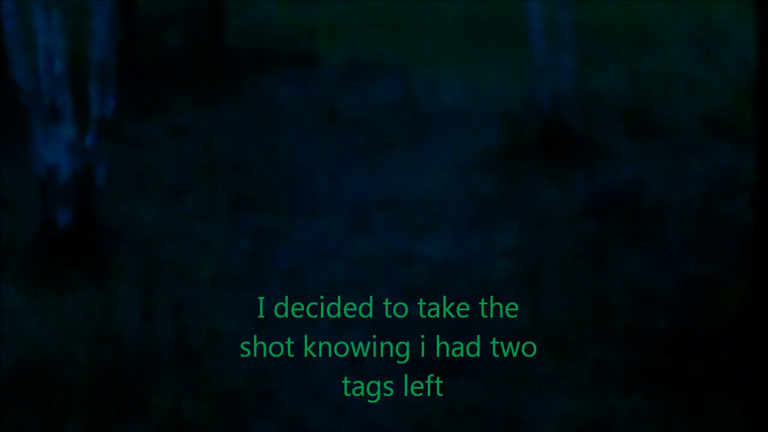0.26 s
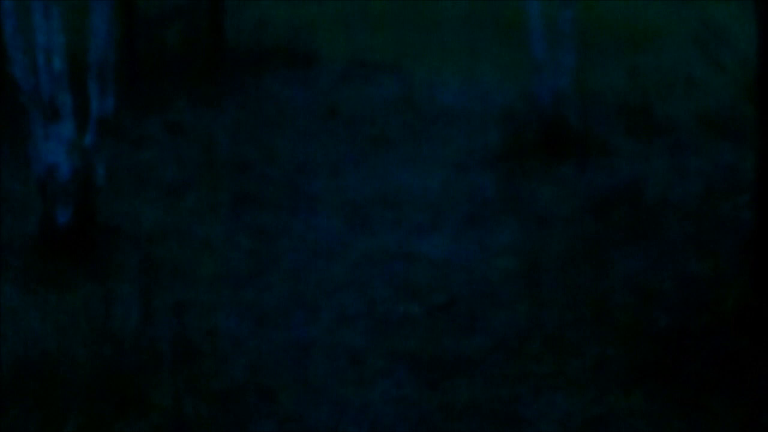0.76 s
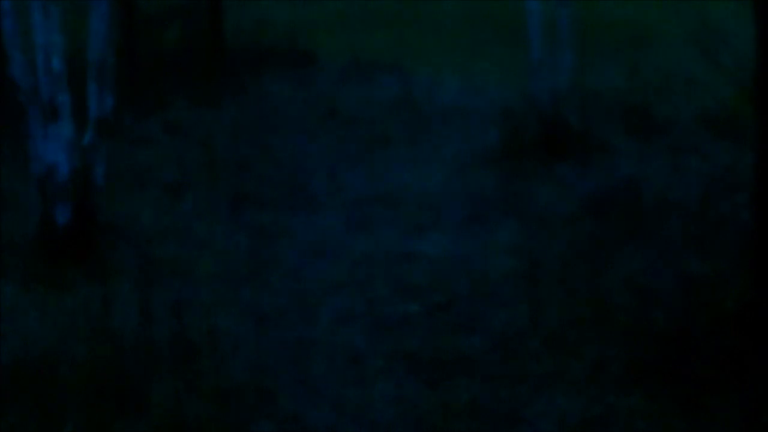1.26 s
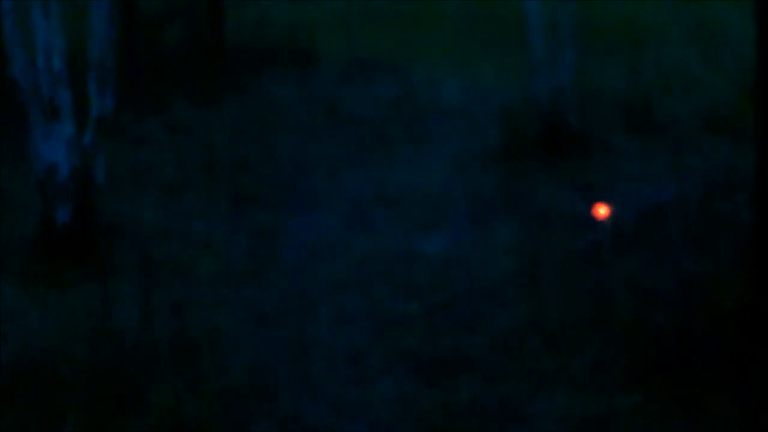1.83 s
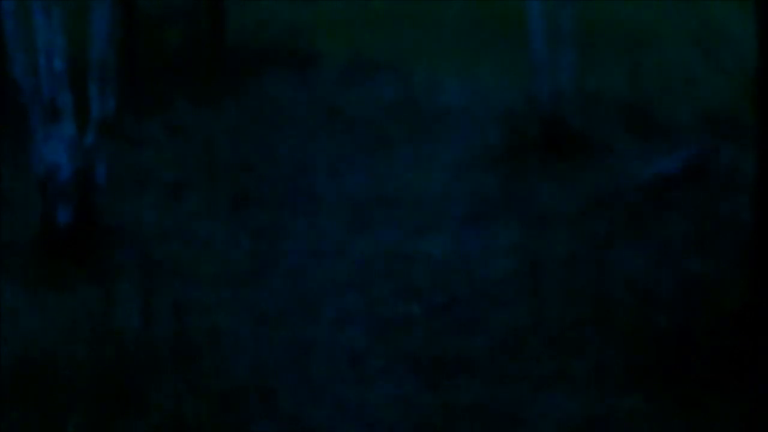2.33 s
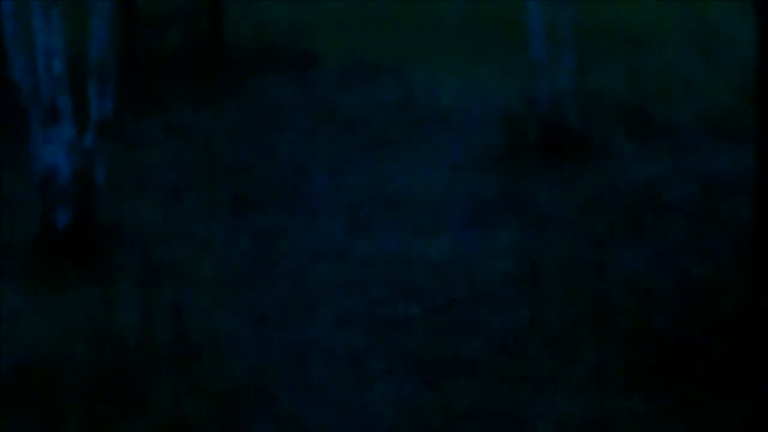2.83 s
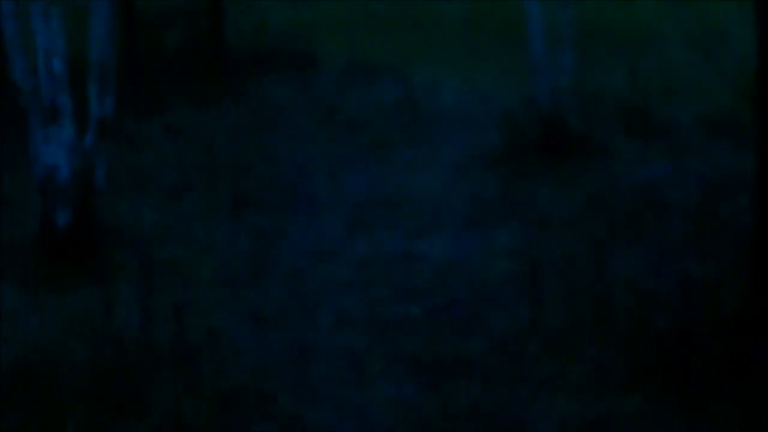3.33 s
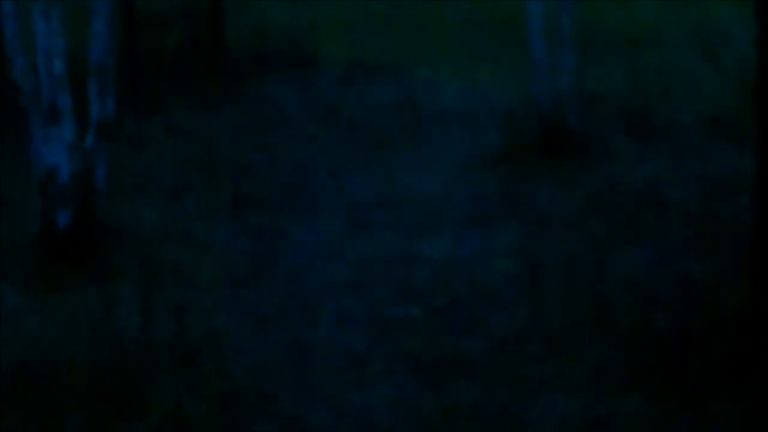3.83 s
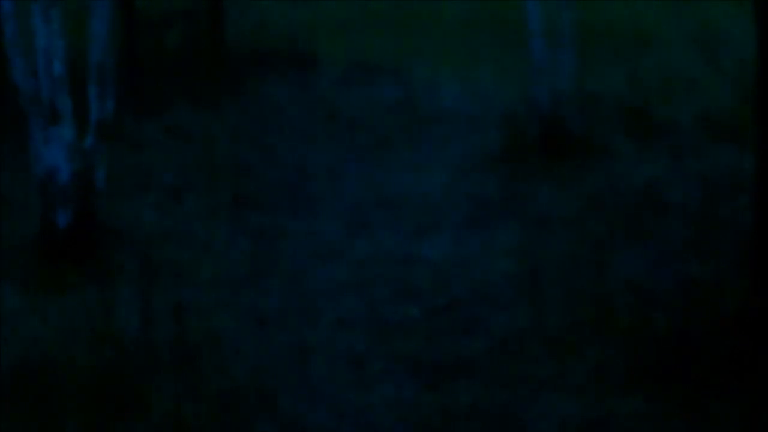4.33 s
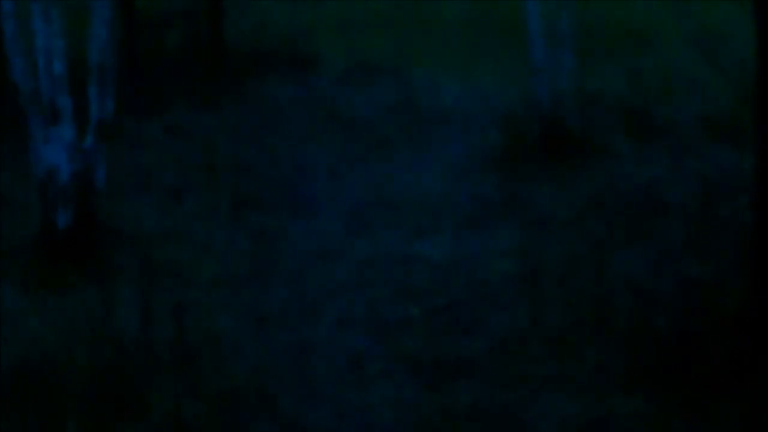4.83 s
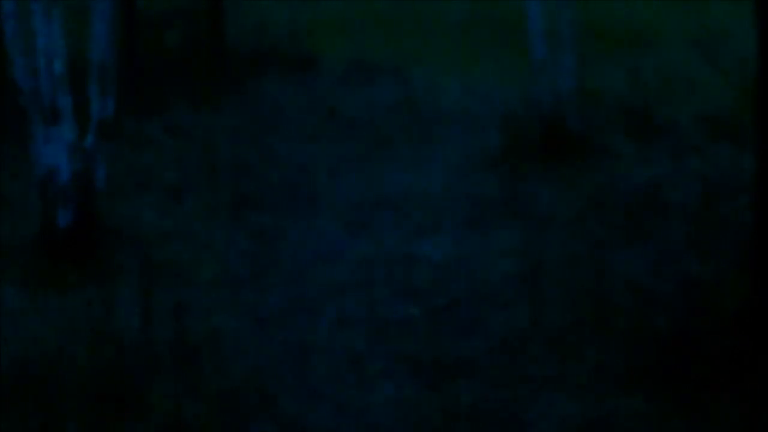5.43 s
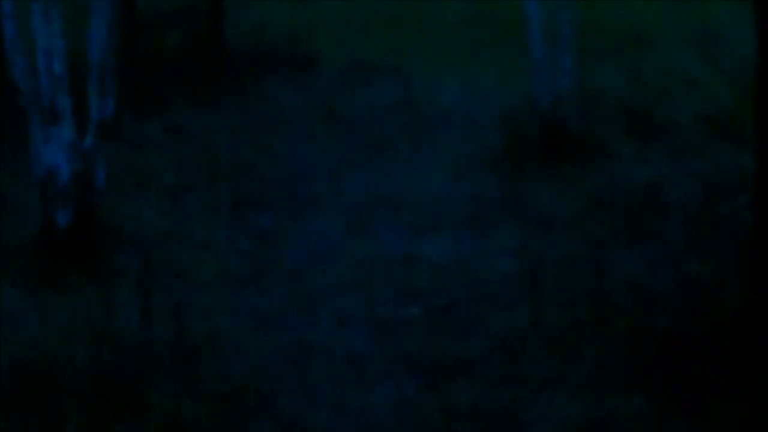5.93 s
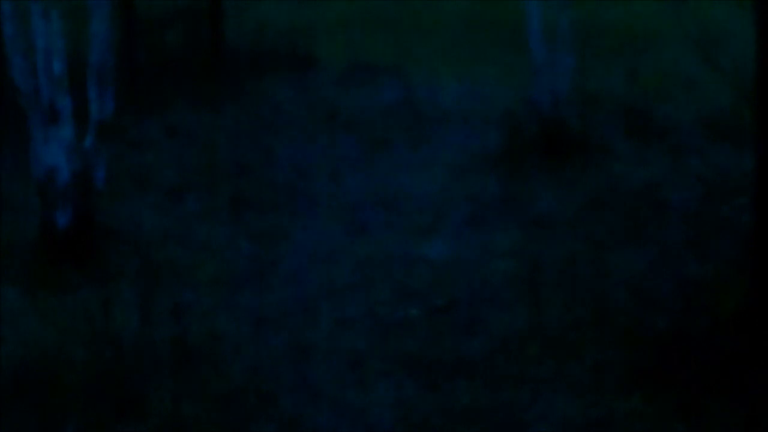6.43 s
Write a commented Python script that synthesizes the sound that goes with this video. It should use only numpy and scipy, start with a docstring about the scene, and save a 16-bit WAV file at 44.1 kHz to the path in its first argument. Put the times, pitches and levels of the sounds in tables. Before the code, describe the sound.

Light rain ticks on leaves in a wood; a bow snaps close by, the arrow smacks hollowly, and an animal crashes off through brush.

```python
"""Bow shot in a rainy wood

Filtered noise and tiny random rings make light rain on leaves and a low breeze; a sleeve of soft noise brushes past.
A bow is shot beside the camera in noise snaps and damped modes, and the arrow strikes with a hollow smack.
An animal bolts through crackling brush on thudding hooves, snapping sticks that ring in short modes.
The camera's microphone rings in the treble, and its gain control ducks when a sound is loud.
"""
import sys
import numpy as np
from scipy import signal
from scipy.fft import rfft, irfft
from scipy.io import wavfile
from scipy.ndimage import map_coordinates

SR = 44100
rng = np.random.default_rng(int(sys.argv[2]) if len(sys.argv) > 2 else 0)


def store_wav(level_fs):
    """Save 16-bit WAV to argv[1]."""
    pcm = np.round(np.clip(np.atleast_2d(level_fs), -1, 1) * 32767)
    wavfile.write(sys.argv[1], SR, pcm.T.astype(np.int16))


N = 294147
TIME = np.arange(N) / SR  # seconds through the scene
AGE = np.arange(SR // 5) / SR  # seconds since one short sound began
IMPACT_S = 1.931  # the arrow lands and the animal starts


def amp(db):
    """Decibels to gain."""
    return 10 ** (np.asarray(db) / 20)


def unit(x):
    """x at rms 1."""
    return x / np.sqrt(np.mean(x ** 2) + 1e-20)


def noise():
    """White noise as long as the scene."""
    return rng.standard_normal(N)


def along(points, hz):
    """Read a curve of (Hz, value) points at hz, on a log frequency axis."""
    f, value = np.transpose(points)
    return np.interp(np.log(hz + 1), np.log(f), value)


def wobble(rate):
    """A smooth random curve with rate knots a second."""
    knots = rng.standard_normal(int(N * rate / SR) + 4)
    return map_coordinates(knots, [TIME * rate])


def coloured(x, points, size=16384):
    """x through a causal, minimum-phase filter with the given (Hz, dB) gain."""
    gain = amp(along(points, np.fft.rfftfreq(size, 1 / SR)))
    cepstrum = irfft(np.log(gain))
    # folding the cepstrum forward puts the energy as early as it can be
    cepstrum[1:size // 2] *= 2
    cepstrum[size // 2 + 1:] = 0
    impulse = irfft(np.exp(rfft(cepstrum)))
    return signal.fftconvolve(x, impulse)[:N]


def add(track, s, sound):
    """Mix a sound in at time s."""
    part = track[round(s * SR):][:len(sound)]
    part += sound[:len(part)]


def fade(t60):
    """Exponential decay that loses 60 dB in t60 seconds."""
    return np.exp(-np.log(1000) * AGE / t60)


def ring(hz, t60):
    """One damped mode."""
    return np.sin(2 * np.pi * hz * AGE) * fade(t60)


def snap(t60):
    """A dying noise burst that starts at rms 1."""
    burst = rng.standard_normal(len(AGE)) * fade(t60)
    return burst * np.linalg.norm(fade(t60)) / np.linalg.norm(burst)


def push(width):
    """Smooth pressure that dips to -1, then swings to +1, width seconds to each side of its centre."""
    u = AGE / width - 3  # the centre comes three widths in
    return u * np.exp((1 - u * u) / 2)


def swells(rows):
    """Gain curve of (s, dB, rise s, fall s) swells; each gains 20 dB over its rise and loses 20 dB over its fall."""
    power = 0
    for s, db, rise, fall in rows:
        steps = np.maximum((s - TIME) / rise, (TIME - s) / fall)
        power = power + amp(db - 20 * steps) ** 2
    return np.sqrt(power)


def grains(rate, spread_db, hz, scatter, cycles):
    """Random tiny impacts, rate a second, each a short ring at its own pitch and size; rms 1 overall."""
    when, size, pitch, phase = rng.random((int(rate * N / SR), 4)).T[:, :, None]
    f = np.clip(hz * np.exp(scatter * np.log(pitch / (1 - pitch))), 500, 15000)
    n = np.arange(SR // 500)
    turns = f * n / SR
    strength = amp(-spread_db * np.log(size + .045)) * np.sqrt(f)
    waves = strength * np.exp(-turns / cycles) * np.sin(2 * np.pi * (turns + phase))
    places = (when * N).astype(int) + n
    return unit(np.bincount(places.ravel(), waves.ravel(), N)[:N])


# how long the wood answers. Each row: frequency in Hz, time to lose 60 dB in seconds
WOOD_T60 = [(150, .15), (1000, 0.28), (2500, 0.37), (8000, 0.35), (15000, 0.076)]


def trees(x):
    """The diffuse answer of trunks and leaves: a noise tail that dies at its own pace in each band."""
    hz, t, z = signal.stft(rng.standard_normal(SR // 2), SR, nperseg=256)
    decay = np.exp(-np.log(1000) * t / along(WOOD_T60, hz)[:, None])
    tail = signal.istft(z * decay, SR, nperseg=256)[1]
    return signal.fftconvolve(x, tail / np.linalg.norm(tail))[:N]


# spectrum of the moving air. Each row: frequency in Hz, gain in dB
RUMBLE = [(10, -10), (28, 0), (60, -1), (130, -3.5), (200, -8.5), (400, -16.5), (900, -29.5), (3000, -70.5)]
AIR_DB, AIR_CALMING_DB_PER_S = -49.8, .35  # the breeze, slowly settling


def air():
    """A low, restless rumble of moving air, made of filtered noise."""
    level = amp(AIR_DB - AIR_CALMING_DB_PER_S * TIME + 1.1 * wobble(9))
    return level * unit(coloured(noise(), RUMBLE))


# single near raindrops. Each row: start in seconds, level in dB, leaf body in dB against that level
DROPS = [(0.3975, -24.5, -15), (0.5276, -18, -16), (0.822, -25, -20), (0.8335, -24.5, -12.5),
         (1.0653, -25.5, -14), (1.1067, -27, -15.5), (3.0255, -24, -15), (3.687, -23.5, -22),
         (3.8823, -26.5, -21), (4.088, -13.5, -26), (4.1572, -25.5, -13.5), (4.2441, -27.5, -18.5),
         (4.2958, -28.5, -17), (4.494, -24, -28), (4.6773, -24.5, -19.5), (5.404, -28.5, -16),
         (5.5345, -26.5, -17), (5.552, -19, -25), (6.5216, -22.5, -18.5), (6.6539, -25.5, -21)]
# spectra of the far rain, a drop bursting, and the leaf it strikes. Each row: frequency in Hz, gain in dB
HISS = [(100, -14), (300, 3), (600, 5), (1300, 1.5), (2500, -2.5), (4500, -3), (9000, -5.5), (16000, -2.5)]
SPLASH = [(200, -21), (1000, -10), (3000, -9.5), (6000, -2.5), (9000, 0.5), (12000, -3.5), (16000, -3)]
LEAF = [(200, -15), (700, -4.5), (1500, -4.5), (3200, 3), (5000, 3.5), (8000, -21), (16000, -28)]
# more drops at random times, mostly lighter, now and then a heavy one
DRIPS_PER_S, DRIP_DB, DRIP_SCATTER_DB, DRIP_BODY_DB = 5, -33, 1.5, -18
HISS_DB, PATTER_DB, EASING_DB_PER_S = -53.7, -58.8, .17  # the shower, slowly letting up


def rain():
    """Far drops merge into a hiss; nearer ones tick on leaves one by one and throw off a fine spray."""
    hiss = amp(HISS_DB + 0.29 * wobble(8.4)) * unit(coloured(noise(), HISS))
    patter_level = amp(PATTER_DB + 2.5 * wobble(14))
    patter = patter_level * grains(rate=400, spread_db=5.0, hz=5600, scatter=0.39, cycles=0.84)

    drips = []
    for when, size in rng.random((int(DRIPS_PER_S * N / SR), 2)):
        drips.append((when * N / SR, DRIP_DB - DRIP_SCATTER_DB * np.log(size), DRIP_BODY_DB))

    bursts, taps = np.zeros(N), np.zeros(N)
    for s, db, body_db in list(DROPS) + drips:
        splash = amp(-8) * snap(t60=0.0054)
        spray = amp(-17) * snap(t60=0.025)
        add(bursts, s, amp(db) * (splash + spray))
        add(taps, s, amp(db + body_db + 8.5) * snap(t60=0.011))
    near = coloured(bursts, SPLASH) + coloured(taps, LEAF)

    shower = amp(-EASING_DB_PER_S * TIME) * (hiss + patter)
    return shower + near + amp(-12.5) * trees(patter + near)


# hollow knocks on wood. Each row: start in seconds, ring in dB, pitch in Hz, ring t60 in seconds, click in dB
KNOCKS = [(0.2531, -29.5, 610, 0.015, -39), (2.152, -35, 880, 0.035, -48)]


def knocks():
    """Dull taps on wood: one damped mode each, under a faint noise click."""
    out = np.zeros(N)
    for s, db, hz, t60, click_db in KNOCKS:
        add(out, s, amp(db) * ring(hz, t60) + amp(click_db) * snap(t60=0.011))
    return out


# the arm shifts slowly, then makes one quick stroke. Each row: time of its height in seconds, level in dB,
# seconds to gain 20 dB, seconds to lose 20 dB
RUSTLE = [(5.55, -53.5, .45, 1.2), (5.765, -46, .3, .12)]
# the sleeve's whistle, a single row with the same columns
SWISH = (5.75, -49, .17, .09)
# spectrum of the soft scrape. Each row: frequency in Hz, gain in dB
SOFT = [(60, -14), (300, 13), (650, 8), (1200, 4.5), (2800, 1.5), (4800, 2), (7000, -0.5), (9000, -0.5),
        (16000, -2)]
SWISH_HZ, SWISH_SAG_OCT_PER_S = 4700, 3.3  # pitch at the whistle's height, and how fast it falls


def cloth():
    """A sleeve brushes past: soft scraping, low bumps, and a swish that falls as the stroke slows."""
    scrape = amp(2.0 * wobble(45)) * unit(coloured(noise(), SOFT))
    bump_level = amp(4 * wobble(35))
    bumps = amp(-6.5) * unit(bump_level * wobble(450) * np.sin(2 * np.pi * 380 * TIME))
    # the fall stays within an octave either way
    hz = SWISH_HZ * 2 ** np.clip(SWISH_SAG_OCT_PER_S * (SWISH[0] - TIME), -1, 1)
    whistle = wobble(1600) * np.sin(2 * np.pi * np.cumsum(hz) / SR)
    return swells(RUSTLE) * (scrape + bumps) + swells([SWISH]) * unit(whistle)


# hooves thud on soft ground. Each row: time of its height in seconds, level in dB
HOOVES = [(2.05, -48), (2.36, -44), (2.625, -43), (2.745, -43)]
# spectrum of soft ground under a hoof. Each row: frequency in Hz, gain in dB
EARTH = [(25, -4), (90, 0), (180, -7), (400, -20), (2000, -55)]
HOOF_RISE_S, HOOF_FALL_S = .025, .14  # time to gain and to lose 20 dB


def hooves():
    """The first bounds thud dully in the earth: swells of low noise."""
    bounds = swells([(s, db, HOOF_RISE_S, HOOF_FALL_S) for s, db in HOOVES])
    return bounds * unit(coloured(noise(), EARTH))


# sticks and twigs break. Each row: start in seconds, level in dB, t60 of its noise snap in seconds
STICKS = [(2.3598, -4, 0.0022), (2.3612, -16.5, 0.0091), (2.434, -20.5, .008), (2.537, -26, .004),
          (2.677, -24, 0.011), (2.872, -24, 0.0046), (3.0014, -23, .006), (3.146, -29, .004),
          (3.198, -25.5, 0.0041), (3.2252, -22.5, 0.0033), (3.2345, -22.5, 0.0031)]
# modes of a breaking stick. Each row: pitch in Hz, level in dB
STICK_MODES = [(2050, -16.5), (2600, -22), (3250, -13), (5300, -8), (6200, -16.5), (8400, -9.5),
               (10800, -15.5), (12600, -15)]
# thin wood radiates little bass. Each row: frequency in Hz, gain in dB
FRACTURE = [(100, -13), (700, -7), (1500, -13), (2000, -3), (9000, 0), (16000, 5)]
# shoves through the brush. Each row: time of its height in seconds, level in dB, seconds to lose 20 dB
BRUSH = [(1.955, -44, .09), (2.11, -55, .3), (2.30, -46, .25), (2.40, -35.5, .2), (2.66, -51, .25),
         (2.90, -48.5, .35), (3.0, -47.5, .35), (3.22, -52, .35)]
# spectrum of the rustling leaves. Each row: frequency in Hz, gain in dB
LEAVES = [(150, -18), (500, -9.5), (1200, -4.5), (2300, -1.5), (6000, 2), (9000, 2.5), (16000, 0)]
BRUSH_RISE_S = .07  # a shove gains 20 dB in this time


def undergrowth():
    """Leaves crackle in tiny impacts and sticks snap in short modes as the animal runs off."""
    sticks = np.zeros(N)
    for s, db, t60 in STICKS:  # modes and noise die together
        fibres = sum(amp(mode_db) * ring(hz, t60) for hz, mode_db in STICK_MODES)
        add(sticks, s, amp(db) * (fibres + amp(-8) * snap(t60)))
    sticks = coloured(sticks, FRACTURE)

    crackle = grains(rate=1300, spread_db=5.5, hz=5860, scatter=0.52, cycles=0.79)
    shoves = swells([(s, db, BRUSH_RISE_S, fall) for s, db, fall in BRUSH])
    shoves = (TIME > IMPACT_S) * shoves
    leaves = shoves * unit(coloured(crackle + amp(-0.5) * noise(), LEAVES))
    return sticks + amp(-14) * trees(sticks) + leaves


def arrow():
    """The arrow lands with a hollow smack: three damped modes and a noise burst, echoed by the trees."""
    hollow = amp(-30) * ring(960, t60=0.038)
    hollow += amp(-29.5) * ring(1110, t60=0.029)
    hollow += amp(-29) * ring(2010, t60=0.024)
    out = np.zeros(N)
    add(out, IMPACT_S, hollow + amp(-21) * snap(t60=.035))
    return out + amp(-9) * trees(out)


# string, cams and limbs come to rest. Each row: start in seconds, snap in dB, ring in dB, snap t60 in seconds
BOW_BLOWS = [(1.5597, -33.5, -52, .04), (1.5823, -18.5, -35, 0.0086), (1.5847, -13, -15.5, 0.0059),
             (1.5867, -11, -32, 0.0052), (1.5917, -22, -28, 0.0081), (1.6020, -26, -26, .012),
             (1.6160, -15, -27, 0.0046), (1.6206, -18.5, -36, 0.014), (1.6345, -25.5, -30, 0.023)]
# modes of limbs and riser. Each row: pitch in Hz, level in dB, t60 in seconds
BOW_MODES = [(131, -15, .04), (255, -21, 0.056), (680, -19, .028), (910, -9, .014), (1070, -1.5, 0.019),
             (1310, -13, .018), (1664, -7, .02), (2060, -19, .1), (2460, -9, .014), (2660, -9, .012),
             (3180, -1.5, 0.018), (4020, -11, .015)]
RELEASE_S, HOME_S = 1.5597, 1.5847  # the string is let go; it reaches its rest position
SLIDE_DB, SLIDE_RISE_S, SLIDE_FALL_S = -19, .014, .007  # the scrape: level, time to gain and lose 20 dB


def bow():
    """The release clicks, the arrow scrapes louder as it gathers speed, the string slams home, fittings rattle."""
    slide = (TIME > RELEASE_S) * swells([(HOME_S, SLIDE_DB, SLIDE_RISE_S, SLIDE_FALL_S)])
    clatter = slide * grains(rate=3000, spread_db=4.5, hz=5000, scatter=.5, cycles=0.95)
    frame = np.zeros(N)
    for s, snap_db, ring_db, t60 in BOW_BLOWS:
        # every blow excites the modes a little differently
        body = sum(amp(db + rng.normal(0, 1.0)) * ring(hz, life) for hz, db, life in BOW_MODES)
        add(clatter, s, amp(snap_db) * snap(t60))
        add(frame, s, amp(ring_db) * body)
    # the limbs shove the air ahead of them, then stop dead
    add(frame, 1.5695, -amp(-32.0) * push(width=.0036))
    add(frame, 1.5817, amp(-31.0) * push(width=.0012))
    return clatter + frame + amp(-8.0) * trees(clatter + amp(-4) * frame)


def scene():
    """Everything at the camera."""
    return (rain() + air() + bow() + arrow() + knocks() + undergrowth() + hooves() + cloth())[None]


def gain_control(x, threshold_db, slope, depth_db, release_db, attack):
    """A loud sound charges the detector; the gain falls to its limit and returns as the charge leaks away."""
    window = SR // 32
    power = signal.lfilter(np.ones(window) / window, 1, x ** 2)
    charge = slope * np.maximum(10 * np.log10(np.abs(power) + 1e-12) - threshold_db, 0)
    # the charge leaks by release_db a second
    held = np.maximum.accumulate(charge + release_db * TIME) - release_db * TIME
    keep = np.exp(-1 / (attack * SR))  # attack in seconds smooths the gain
    cut_db = signal.lfilter([1 - keep], [1, -keep], np.minimum(held, depth_db))
    return x * amp(-cut_db)


# the microphone's colour, with peaks in the treble. Each row: frequency in Hz, gain in dB
MIC = [(1000, 0), (4300, 0.5), (5500, 3.5), (6350, 5), (7100, -3), (7900, 5), (8700, 10.5), (9600, 5),
       (11000, -2), (13000, -7), (16000, -9)]
TOP_HZ = 15950  # upper band limit


def record(dry):
    """Microphone colour, gain control, the camera's own faint hiss and its band limit."""
    x = coloured(dry[0], MIC)
    x = gain_control(x, threshold_db=-32.5, slope=3.67, depth_db=17, release_db=69, attack=0.028)
    x = x + amp(-70) * noise()
    passed = np.fft.rfftfreq(N, 1 / SR) < TOP_HZ
    return irfft(rfft(x) * passed, N)[None]


dry = scene()
out = record(dry)
store_wav(out)
```